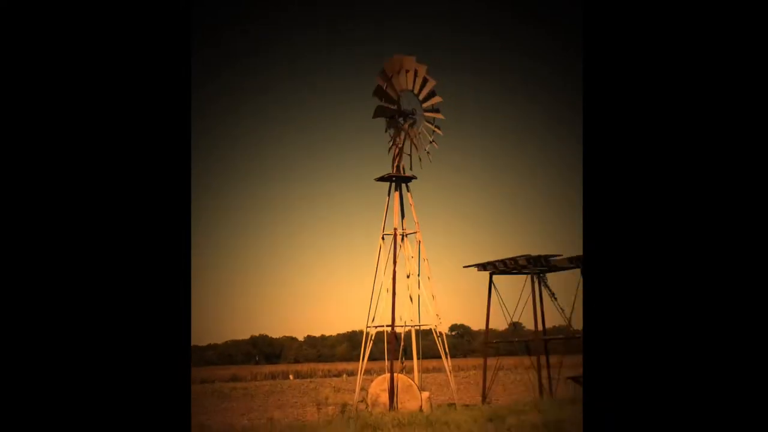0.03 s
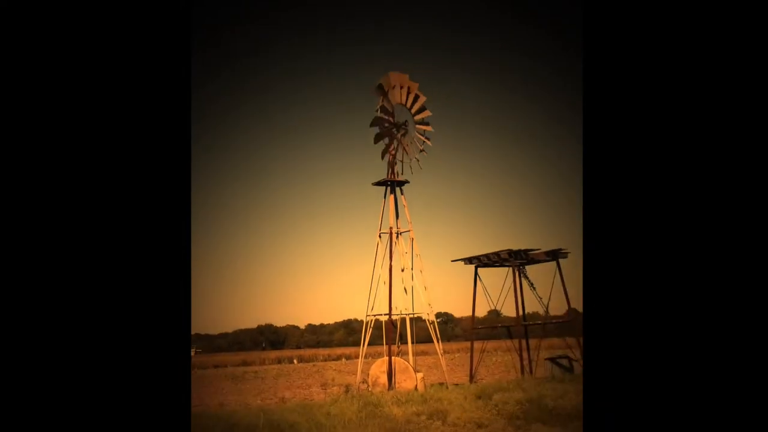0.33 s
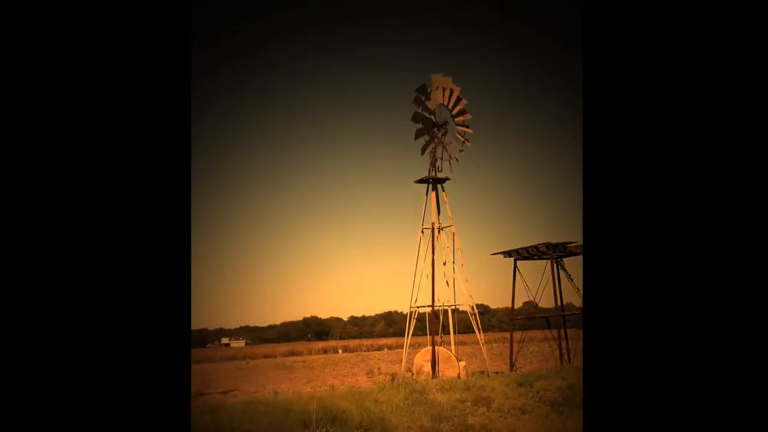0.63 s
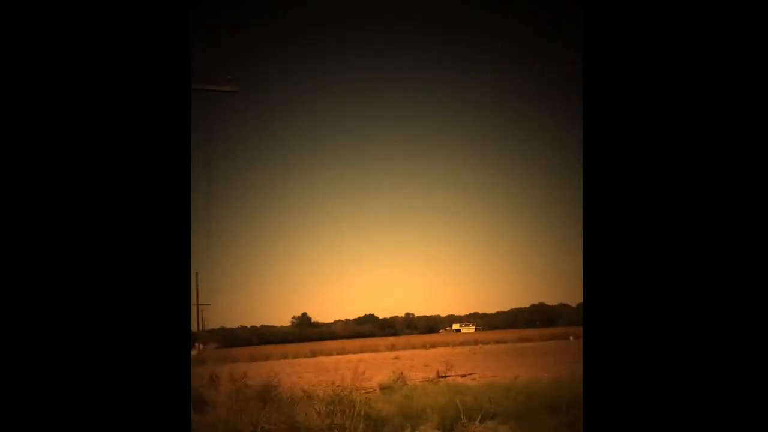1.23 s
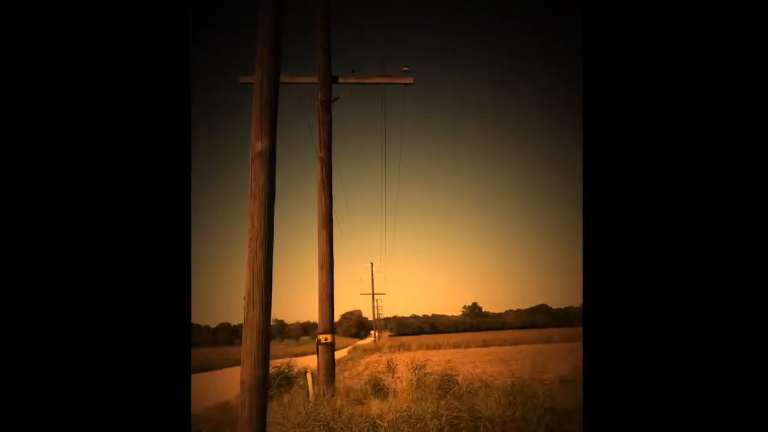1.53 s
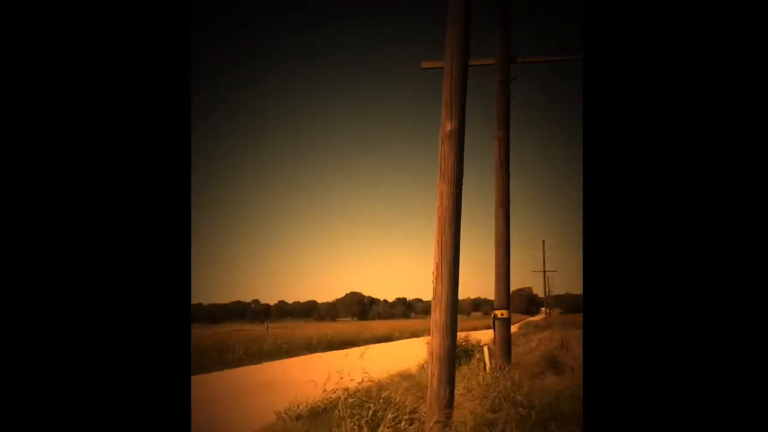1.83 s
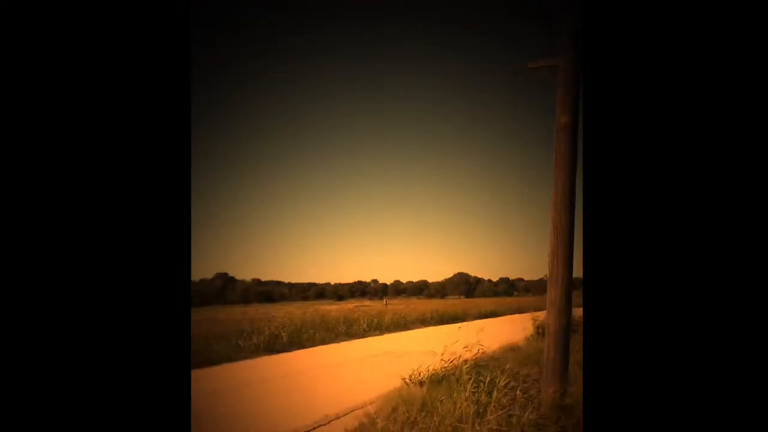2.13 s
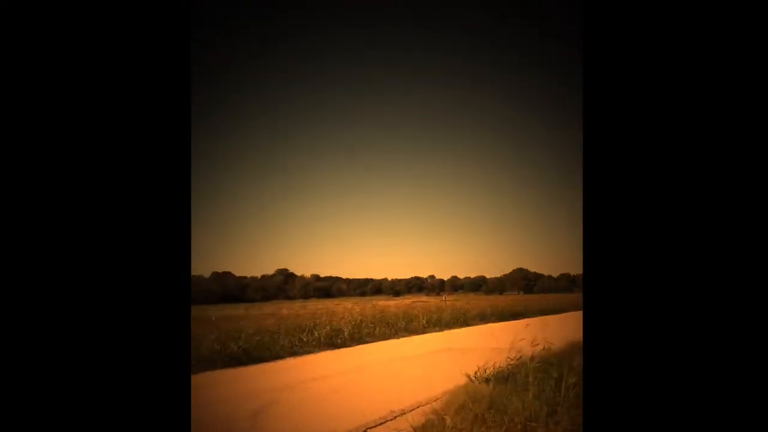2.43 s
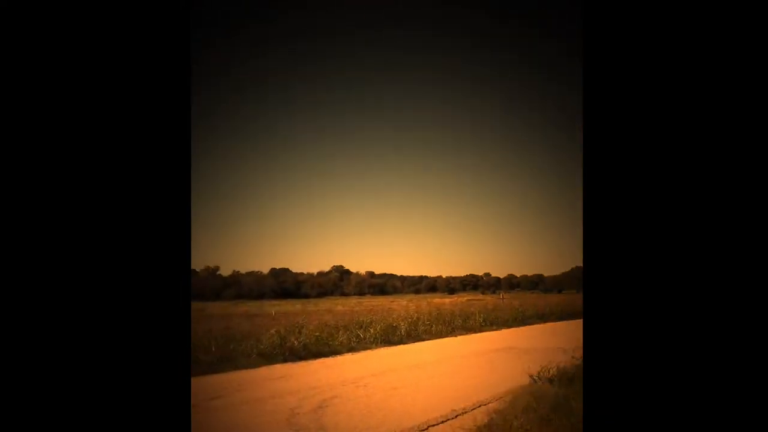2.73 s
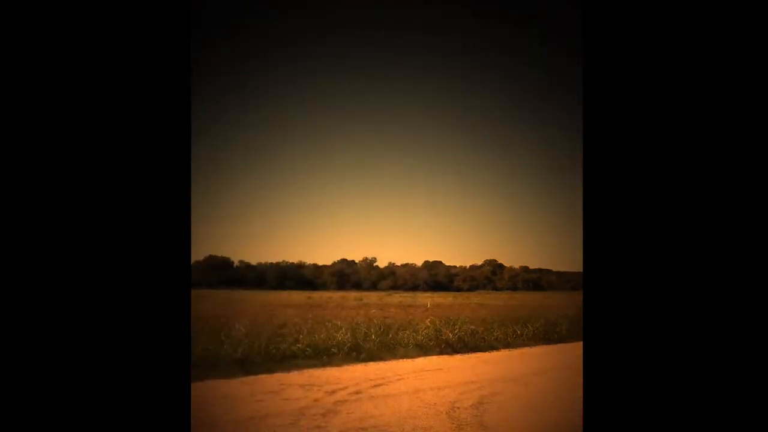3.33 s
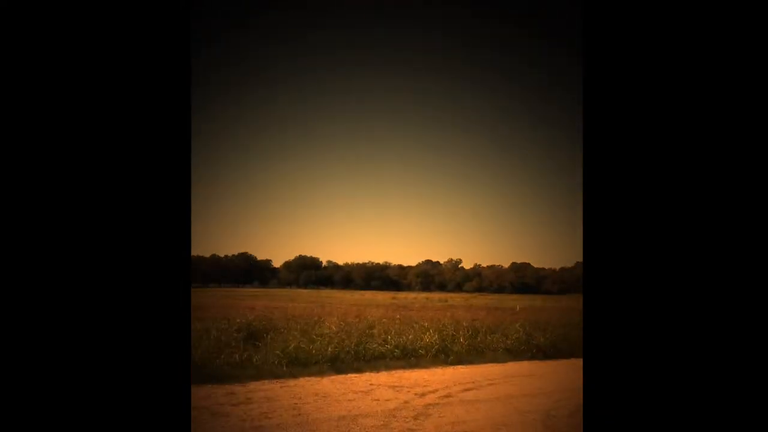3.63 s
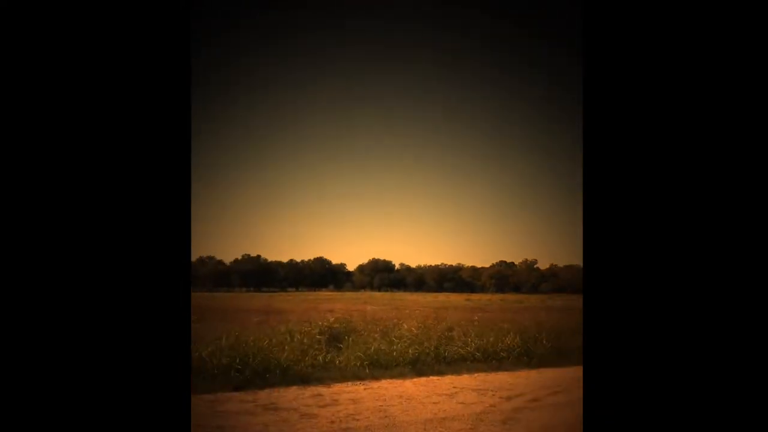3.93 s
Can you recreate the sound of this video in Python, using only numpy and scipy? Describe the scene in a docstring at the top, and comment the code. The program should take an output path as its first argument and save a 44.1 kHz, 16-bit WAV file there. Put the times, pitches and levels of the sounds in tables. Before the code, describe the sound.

A dry windmill bearing squeals and scrapes outdoors, then eases, leaving a constant high insect buzz, a click and faint grass rustle. A second squeal follows as wind rises and thumps loudly against the microphone.

```python
"""An old farm windmill turns in a field. At once its dry bearing binds: it scrapes, rings the steelwork
and squeals on two close modes, over a steady insect buzz, distant air and a soft puff of wind.
Near 1 s the bearing whistles thinly; then a stick clicks and the grass rustles faintly.
From halfway on, wind rumbles on the microphone and the bearing binds a second time.
As that squeal dies near 3 s, gusts and hard eddies buffet the microphone through to the end."""
import sys
import numpy as np
from scipy import signal
from scipy.fft import rfft, irfft
from scipy.io import wavfile
from scipy.ndimage import uniform_filter1d, minimum_filter1d, map_coordinates

SR = 44100
rng = np.random.default_rng(int(sys.argv[2]) if len(sys.argv) > 2 else 0)


def transcribe(signal):
    """Save signal, clipped to [-1, 1], as a 16-bit WAV file at the path in sys.argv[1]."""
    frames = np.atleast_2d(signal).T
    limited = np.clip(frames, -1, 1)
    pcm = np.round(limited * 32767).astype(np.int16)
    wavfile.write(sys.argv[1], SR, pcm)


N = 176400
T = np.arange(N) / SR
FREQS = np.arange(N // 2 + 1) * SR / N


def undb(db):
    """Decibels to gain."""
    return 10 ** (np.asarray(db) / 20)


def unit(x):
    """Scale to rms 1."""
    return x / np.sqrt(np.mean(np.abs(x) ** 2))


def curve(rows, col):
    """One column of a table, joined by straight lines in time."""
    rows = np.array(rows, float)
    return np.interp(T, rows[:, 0], rows[:, col])


def swell(rows, col):
    """Gain envelope from a dB column, fading out beyond the table's ends."""
    outside = np.maximum(rows[0][0] - T, 0) + np.maximum(T - rows[-1][0], 0)
    return undb(curve(rows, col)) * np.exp(-outside / 0.032)


def shaped_noise(gains):
    """White noise through one gain per frequency, at rms 1."""
    return unit(irfft(rfft(rng.standard_normal(N)) * gains, N))


def noise(colour):
    """Noise through an EQ curve of (frequency [Hz], gain [dB]) points."""
    hz, db = np.array(colour, float).T
    return shaped_noise(undb(np.interp(np.log(FREQS + 1), np.log(hz), db)))


def ring(hz, width):
    """A resonance kept ringing by random pushes."""
    return shaped_noise(1 / (1 + ((FREQS - hz) / width) ** 2))


def walk(rate):
    """Smooth random modulation with spread 1, moving up to about `rate` times a second."""
    return ring(0, rate)


def stick_slip(rows, overtones, jitter_hz, rasp, halo, twin):
    """A friction tone split into a chattering pair; overtones grow with level, the tower scatters each."""
    split_hz, wander_hz, scatter_hz, width_hz = 26, 14, 18, 10
    gain, reference = swell(rows, 2), undb(-35)
    phase = 2 * np.pi * np.cumsum(curve(rows, 1) + jitter_hz * walk(70)) / SR + rasp * walk(250)
    beat = np.pi * np.cumsum(split_hz + wander_hz * walk(15.5)) / SR
    out = 0
    for ratio, db, growth in [(1, 0.0037, 1)] + list(overtones):
        scatter = ring(scatter_hz * ratio, width_hz * ratio) + 1j * ring(scatter_hz, width_hz)
        pair = np.exp(-1j * beat) + twin * ratio * np.exp(1j * beat)
        chatter = unit(pair + halo * ratio * scatter)
        envelope = reference * undb(db) * (gain / reference) ** growth
        out += envelope * np.real(chatter * np.exp(1j * ratio * phase))
    return np.sqrt(2) * out


# main squeal, one list per turn (time [s], pitch [Hz], level [dB])
MAIN_SQUEALS = [
    [(0, 5130, -35), (.19, 5130, -37.5), (.31, 5145, -39.5), (.34, 5152, -49.5), (.51, 5140, -53),
     (.56, 5140, -64), (.82, 5142, -70), (.92, 5142, -86)],
    [(2.25, 5200, -68), (2.32, 5180, -43), (2.47, 5165, -43.5), (2.52, 5142, -36.5), (2.71, 5144, -39),
     (2.82, 5140, -43), (2.91, 5140, -53), (3.04, 5140, -57), (3.1, 5140, -70), (3.3, 5140, -82)],
]
# upper squeal, one list per turn (time [s], pitch [Hz], level [dB])
UPPER_SQUEALS = [
    [(0, 5230, -53), (.08, 5235, -41.5), (.14, 5240, -54), (.2, 5235, -60), (.3, 5235, -70)],
    [(1.96, 5300, -82), (2.0, 5295, -54), (2.07, 5285, -61), (2.12, 5255, -48.5), (2.23, 5262, -46.5),
     (2.26, 5250, -42.5), (2.35, 5232, -41), (2.53, 5264, -42), (2.62, 5220, -55), (2.9, 5215, -52)],
]
# overtones of each (pitch ratio [x], level relative to a -35 dB squeal [dB], growth [dB per dB])
MAIN_OVERTONES = [(1.5, -21, 1.7), (2, -8.7, 1.7), (2.5, -25, 2), (3, -20.5, 1.9)]
UPPER_OVERTONES = [(2, -10, 1.54), (3, -23, 1.5)]


def bearing_squeal():
    """The dry bearing binds and sings on two close modes that beat against each other."""
    out = 0
    for main, upper in zip(MAIN_SQUEALS, UPPER_SQUEALS):
        out += stick_slip(main, MAIN_OVERTONES, jitter_hz=6, rasp=.06, halo=.22, twin=.7)
        out += stick_slip(upper, UPPER_OVERTONES, jitter_hz=11, rasp=.1, halo=.4, twin=.35)
    return out


# scrape envelope, one list per turn (time [s], level [dB])
SCRAPE_ENVELOPES = [
    [(0, -50), (.1, -52.5), (.19, -50), (.28, -53.5), (.35, -60.5), (.55, -77.5)],
    [(2.28, -68), (2.34, -56), (2.44, -58), (2.55, -46.5), (2.64, -44.5), (2.75, -48.5), (2.9, -58),
     (3.1, -77)],
]
# scrape EQ, one list per turn, the second darker (frequency [Hz], gain [dB])
SCRAPE_EQS = [
    [(500, -32), (1200, -12), (2200, 3), (3400, -1), (5500, -1), (8000, -2.5), (10000, 1), (11800, -4),
     (13000, -2), (15000, -10)],
    [(500, -21), (1100, 2.5), (1600, 3), (3400, -6), (5500, -5.5), (8000, -12), (10000, -8.5), (11800, -13),
     (13000, -16), (15000, -18)],
]


def bearing_scrape():
    """Dry metal rubs on metal: a swell of gritty noise on each turn."""
    return sum(swell(envelope, 1) * noise(eq) * undb(1.4 * walk(120))
               for envelope, eq in zip(SCRAPE_ENVELOPES, SCRAPE_EQS))


# steelwork modes (pitch [Hz], width [Hz], gain in voicing 1 [dB], in voicing 2 [dB], in voicing 3 [dB])
STEEL_MODES = [(1317, 31, 0.5, -8, -1.5), (1665, 30, -15, -30, -3), (1771, 20, -16, -30, 0.5),
               (1955, 40, -4.5, -27, -17.5), (2146, 8, -23, -23, 1.5), (2240, 14, -8, -1.5, -27),
               (2387, 12, -16, -17, -3), (2570, 11.4, 1, -3, -5), (2900, 9, -26, 2.5, -27),
               (2980, 7, -13, -24, -0.5), (7440, 18, -22, -6.5, -23.5), (7660, 28, -3, -14, -18),
               (8160, 30, -26, -12, -22)]
# one envelope per voicing; the second catches abruptly (time [s], level [dB])
STEEL_ENVELOPES = [
    [(0, -75), (.1, -58.5), (.21, -57.5), (.3, -58), (.45, -69)],
    [(.22, -78), (.243, -52.5), (.33, -53.5), (.39, -63), (.55, -77), (.8, -100), (2.28, -100), (2.35, -64),
     (2.45, -69), (2.56, -80)],
    [(2.48, -76), (2.58, -60), (2.65, -54), (2.8, -62), (2.92, -71), (3.1, -86.5)],
]


def steelwork():
    """The scraping bearing rings the steel, voicing the same modes in three different balances."""
    out = 0
    for voicing, envelope in enumerate(STEEL_ENVELOPES):
        modes = sum(undb(dbs[voicing]) * ring(hz, width) for hz, width, *dbs in STEEL_MODES)
        out += swell(envelope, 1) * modes
    return out


# buzz envelope (time [s], level [dB])
INSECT_ENVELOPE = [(0, -57), (1.4, -60), (1.75, -62), (1.95, -59), (2.37, -64.5), (2.9, -62), (3.3, -64),
                   (3.67, -67.5), (3.8, -61.5), (3.92, -63.5), (4, -65)]


def insect():
    """Each wing stroke is a short tone that sags in pitch; a weaker, lower rasp fills the return."""
    strokes_per_s, duty, pitch_hz, sag_hz = 82.6, 0.62, 4310, 224
    cycle = np.cumsum(strokes_per_s * (1 + 0.018 * walk(63))) / SR % 1
    closing = np.minimum(cycle / duty, 1)
    hz = pitch_hz - sag_hz * (closing - .5) + 24 * walk(100) + 12 * walk(2)
    stroke = np.sin(np.pi * closing)
    tone = stroke * np.sin(2 * np.pi * np.cumsum(hz) / SR) * undb(0.23 * walk(40))
    rasp = cycle * (1 - stroke) * ring(4150, 90)
    return undb(curve(INSECT_ENVELOPE, 1)) * (unit(tone) + undb(-10) * unit(rasp))


# EQ of the open-country bed (frequency [Hz], gain [dB])
AIR_EQ = [(25, -33), (50, 0.5), (100, -1), (160, 0), (300, -3), (500, -9), (1000, -12), (1600, -17.5),
          (2500, -24.5), (3500, -27), (6000, -30.5), (10000, -34.5), (15500, -38)]


def field():
    """A bed of distant air and a low, wavering, far-off drone."""
    air_db, drone_db, drone_hz = -51, -55, 156.7
    drone = np.sin(2 * np.pi * np.cumsum(drone_hz + 2 * walk(6)) / SR) * undb(2 * walk(9.1))
    return undb(air_db + 0.68 * walk(6.8)) * noise(AIR_EQ) + undb(drone_db) * unit(drone)


# soft thuds (time [s], level [dB], pitch [Hz])
PUFF_CUES = [(.235, -43, 80.5), (2.27, -30.5, 58.6), (2.53, -36, 64.4)]


def wind_puffs():
    """Slow puffs of air thud on the microphone, each a rounded swell of low noise."""
    return sum(undb(db) * np.exp(-((T - at) / 0.029) ** 2) * ring(hz, hz) for at, db, hz in PUFF_CUES)


# whistle glide (time [s], pitch [Hz], level [dB])
WHISTLE_GLIDE = [(.96, 6660, -81), (1.02, 6800, -71), (1.1, 6780, -69), (1.24, 6740, -84)]


def bearing_whistle():
    """Between squeals the bearing gives one brief, thin friction tone with no overtones."""
    return stick_slip(WHISTLE_GLIDE, [], jitter_hz=26, rasp=.05, halo=.48, twin=.3)


def flick(at, hz, cycles):
    """A very short oscillation that slows as it dies."""
    sag_per_cycle = .42
    age = np.clip((T - at) * hz, -8, 8)
    turns = (1 - np.exp(-sag_per_cycle * age)) / sag_per_cycle
    return np.exp(-(age / cycles) ** 2) * np.cos(2 * np.pi * turns)


# dry clicks (time [s], level [dB], pitch [Hz])
CLICK_CUES = [(1.1861, -34.5, 1740), (3.945, -37, 2700)]


def stick_clicks():
    """Dry sticks click; each rebounds once, a little weaker."""
    rebound_s, rebound_db, cycles = .0014, -1, .7
    return sum(undb(db) * (flick(at, hz, cycles) + undb(rebound_db) * flick(at + rebound_s, hz, cycles))
               for at, db, hz in CLICK_CUES)


# rustles (time [s], level [dB], decay [s])
RUSTLE_CUES = [(1.41, -58.5, 0.099), (1.865, -45, 0.016), (1.894, -43.5, 0.014), (1.926, -53.5, 0.094),
               (3.028, -51, 0.015), (3.05, -53, 0.018), (3.544, -51.5, .005), (3.942, -51.5, 0.016),
               (3.968, -52, 0.013)]
# EQ of dry stems (frequency [Hz], gain [dB])
RUSTLE_EQ = [(600, -18.5), (1400, 2.5), (2300, -5), (3400, -10.5), (6000, -21.5), (12000, -30.5)]


def grass_rustle():
    """Dry stems brush in short grainy bursts."""
    attack_s = 0.0051
    envelope = 0
    for at, db, decay in RUSTLE_CUES:
        attack = np.clip((T - at) / attack_s + 1, 0, 1)
        envelope += undb(db) * attack * np.exp(-np.maximum(T - at, 0) / decay)
    return envelope * unit(noise(RUSTLE_EQ) * undb(1.7 * walk(400)))


# rumble envelope (time [s], level [dB])
RUMBLE_ENVELOPE = [(1.72, -64.5), (1.74, -65), (1.78, -35.5), (1.92, -49), (1.95, -33), (2.02, -56.5),
                   (2.09, -34.5), (2.18, -42.5), (2.2, -33), (2.7, -33.5), (2.74, -47.5), (2.79, -33.5),
                   (2.83, -40.5), (2.86, -26.5), (2.93, -37.5), (2.96, -19.5), (3.08, -22.5), (3.22, -15.5),
                   (3.29, -29.5), (3.46, -18.5), (3.51, -24.5), (3.57, -19), (3.62, -27), (3.75, -20.5),
                   (3.8, -37), (3.85, -24.5), (3.97, -33), (4.0, -26)]
# rumble EQ when the envelope is at -25 dB (frequency [Hz], gain [dB])
RUMBLE_EQ = [(20, -17.5), (60, 0), (110, 1), (170, 2.5), (260, -4.5), (400, -18.5), (700, -23.5),
             (1500, -63.5), (4000, -70.5)]


def wind_rumble():
    """Wind rumbles on the microphone; the stronger it blows, the faster and brighter the noise runs."""
    db_per_octave = 50
    speed = 2 ** ((curve(RUMBLE_ENVELOPE, 1) + 25) / db_per_octave)
    return swell(RUMBLE_ENVELOPE, 1) * map_coordinates(noise(RUMBLE_EQ), [np.cumsum(speed)], mode="wrap")


# gated gusts (time [s], hold [s], level [dB], roll-off [Hz])
GUST_CUES = [(1.943, 0.012, -32, 370), (2.062, 0.038, -42, 380), (2.197, 0.028, -36, 400),
             (2.217, 0.012, -31.5, 520), (2.28, 0.04, -34.5, 407), (2.365, 0.012, -31.5, 385),
             (2.499, 0.015, -32.5, 400), (2.577, 0.041, -39, 276), (2.661, 0.024, -44.5, 344),
             (2.873, 0.011, -23.5, 570), (2.949, 0.068, -28, 473), (3.034, 0.023, -21.5, 464),
             (3.076, 0.02, -21, 504), (3.109, 0.05, -19.5, 481), (3.174, 0.05, -15, 600),
             (3.245, 0.024, -23.5, 500), (3.295, 0.016, -27, 480), (3.322, 0.027, -18, 530),
             (3.364, 0.13, -22, 526), (3.436, 0.0547, -15.5, 660), (3.483, 0.1, -22.5, 493),
             (3.609, 0.0065, -29.5, 514), (3.642, 0.031, -17, 630), (3.683, 0.038, -18.5, 600),
             (3.7, 0.044, -18.5, 716), (3.828, 0.0087, -26.5, 576), (3.875, 0.0057, -29, 526),
             (3.9, 0.016, -29, 510), (3.983, 0.028, -27, 490)]


def wind_gusts():
    """Turbulence breaks over the microphone; where it surges, eddies pass faster and sound brighter."""
    attack_s, release_s, low_cut_hz, slope = 0.0019, 0.0046, 249, 4.83
    surge = ring(103.9, 49.36)
    flutter = unit(undb(1.5 * surge))
    playhead = np.cumsum(2 ** (.2 * surge)) % N
    low_cut = FREQS ** 2 / np.hypot(FREQS ** 2, low_cut_hz ** 2)
    out = 0
    for at, hold, db, rolloff_hz in GUST_CUES:
        attack = np.clip((T - at) / attack_s + .5, 0, 1)
        release = np.exp(-np.clip((T - at - hold) / release_s, 0, 20))
        eddies = shaped_noise(low_cut / (1 + (FREQS / rolloff_hz) ** slope))
        out += undb(db) * attack * release * flutter * np.interp(playhead, np.arange(N), eddies)
    return out


# hard thumps (time [s], level [dB], pitch [Hz])
BUFFET_CUES = [(2.224, -27, 485), (2.278, -25, 368), (2.498, -27, 378), (2.785, -31.5, 312),
               (2.860, -7.5, 477), (3.004, -12, 376), (3.129, -5.5, 348), (3.189, -12.5, 620),
               (3.202, -7, 340), (3.443, 0, 306), (3.451, -1.5, 385), (3.455, -9.5, 683),
               (3.563, -11.5, 288), (3.584, -16.5, 520), (3.610, -21, 526), (3.657, -19, 685),
               (3.707, -11, 513), (3.727, -13.5, 744), (3.743, -7, 387), (3.75, -17, 149),
               (3.862, -12, 284), (3.864, -15.5, 636), (3.903, -18.5, 490)]


def wind_buffets():
    """Single hard eddies hit the microphone, each a thump that drops in pitch."""
    return sum(undb(db) * flick(at, hz, cycles=.66) for at, db, hz in BUFFET_CUES)


def scene():
    """The mono mix at one microphone, with a low cut on the wind layers."""
    low_cut_hz = 46.3
    windmill = bearing_squeal() + bearing_scrape() + steelwork() + bearing_whistle()
    ambience = insect() + field() + stick_clicks() + grass_rustle()
    wind = wind_puffs() + wind_rumble() + wind_gusts() + wind_buffets()
    wind = signal.sosfilt(signal.butter(3, low_cut_hz, "high", fs=SR, output="sos"), wind)
    return (windmill + ambience + wind)[None]


def record(dry):
    """A limiter catches the hardest buffets, and a steep filter cuts the top."""
    ceiling, ramp_samples, high_cut_hz = .97, 300, 15750
    needed_gain = ceiling / np.maximum(np.abs(dry), ceiling)
    held_gain = minimum_filter1d(needed_gain, size=2 * ramp_samples)
    limited = dry * uniform_filter1d(held_gain, size=ramp_samples)
    return signal.sosfilt(signal.ellip(10, .2, 80, high_cut_hz, fs=SR, output="sos"), limited)


dry = scene()
out = record(dry)
transcribe(out)
```